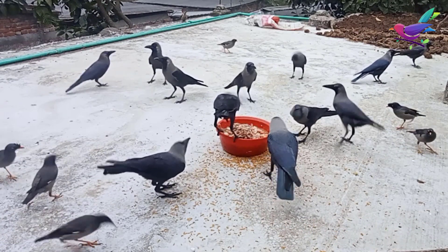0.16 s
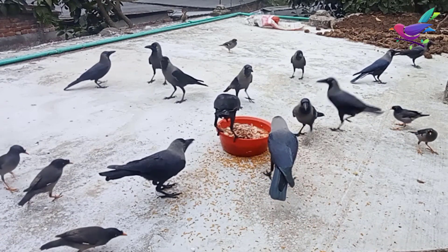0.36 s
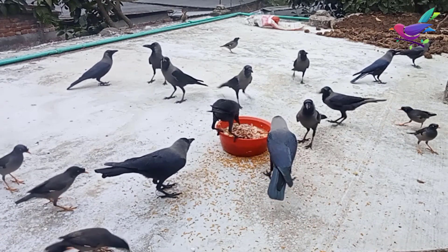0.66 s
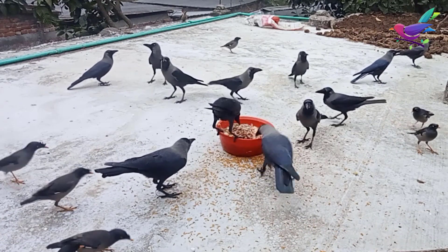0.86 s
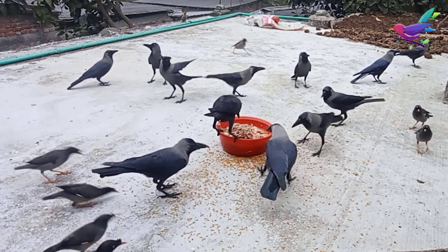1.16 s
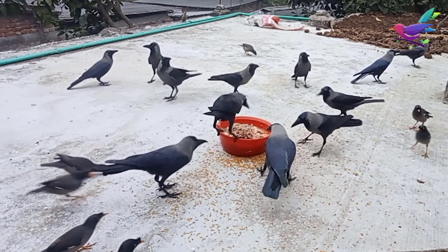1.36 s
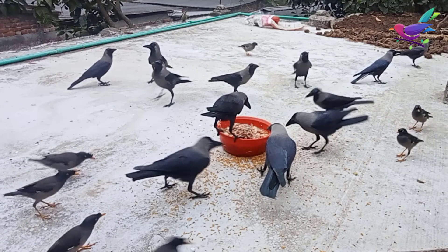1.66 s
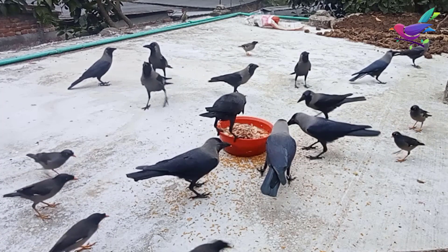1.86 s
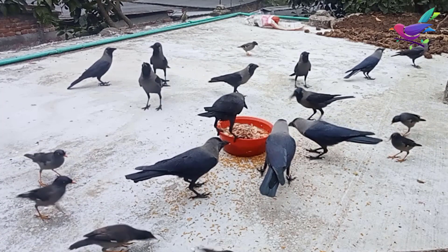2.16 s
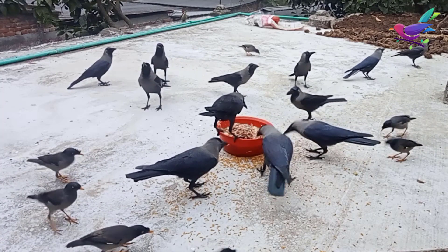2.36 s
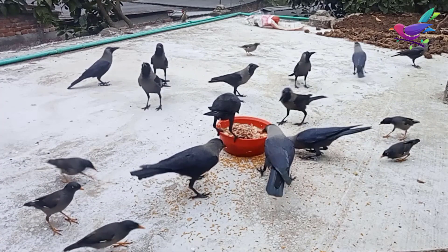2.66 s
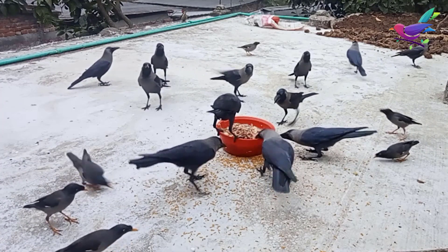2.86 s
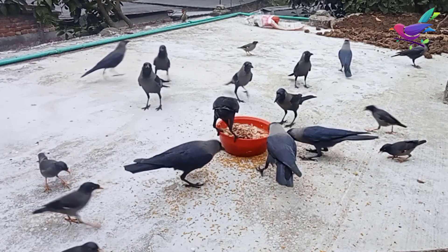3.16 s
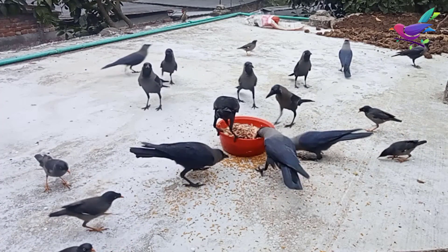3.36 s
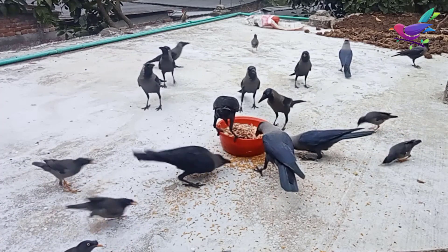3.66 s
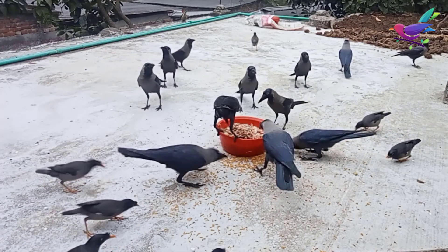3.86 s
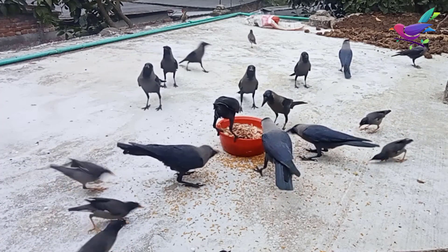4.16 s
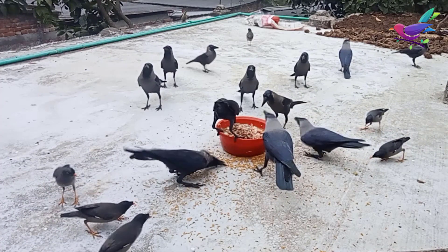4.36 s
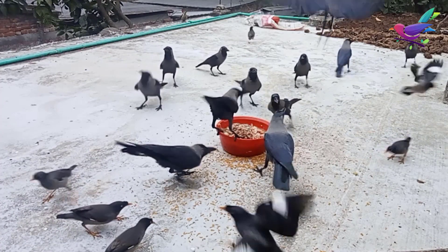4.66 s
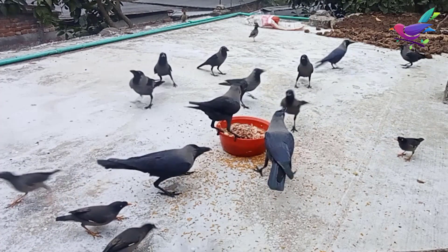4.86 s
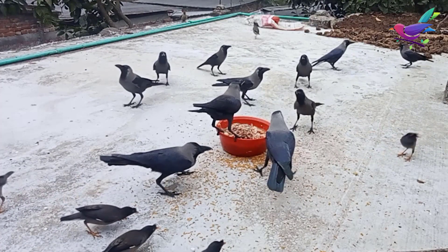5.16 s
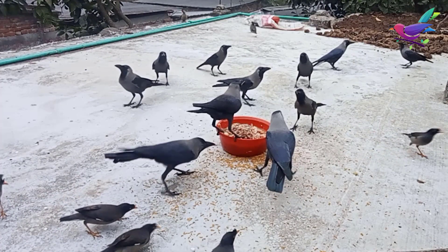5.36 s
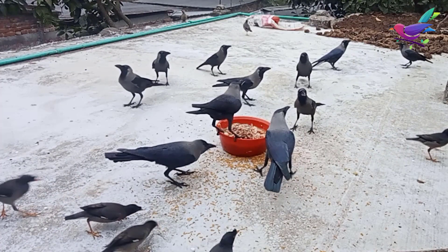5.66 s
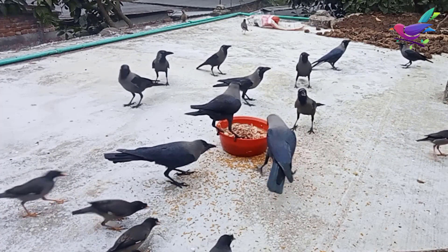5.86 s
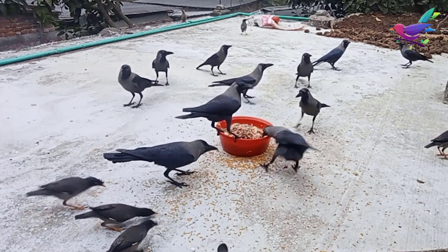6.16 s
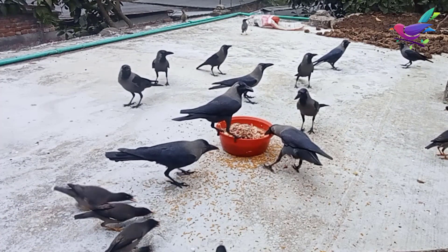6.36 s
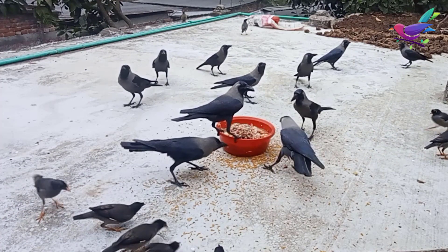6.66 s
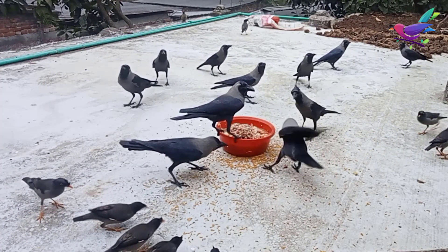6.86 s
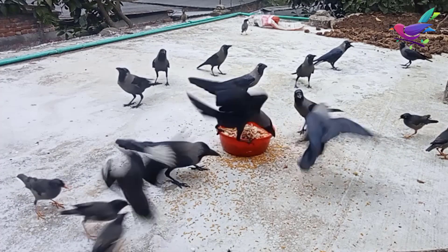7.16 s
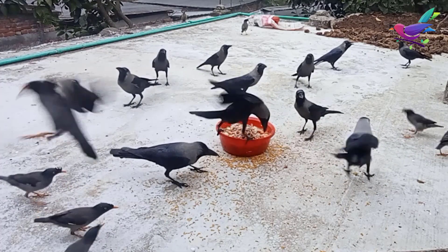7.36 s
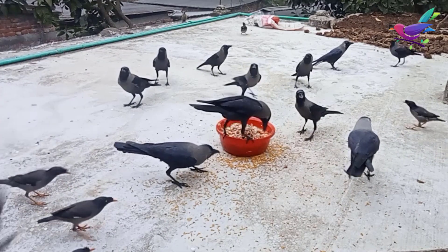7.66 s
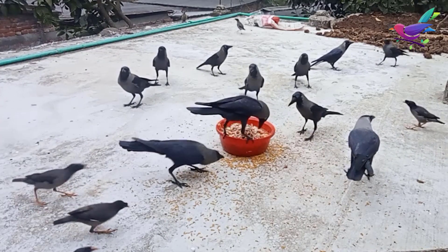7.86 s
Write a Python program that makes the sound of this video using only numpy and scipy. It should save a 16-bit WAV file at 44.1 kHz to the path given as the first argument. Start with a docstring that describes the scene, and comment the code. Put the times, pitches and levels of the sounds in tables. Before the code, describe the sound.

Beaks tick on concrete amid distant cawing, faint chirps and low traffic, ending with two loud caws from squabbling crows.

```python
"""A concrete rooftop over the low rumble of a town: crows and mynas feed from a plastic bowl.
Beaks tick and scrape, claws scatter grain, mynas chirp, crows caw from the trees, wings flap past.
Near the end two crows squabble close by: two loud, harsh caws, one running into the other.
Each call is a pulsing membrane, shaken into a rasp by a slower one. Pecks are impulses with a rattle;
wingbeats are swish, air puff and hum. Walls and trees echo; the microphone colours the treble."""
import sys
import numpy as np
from scipy import signal
from scipy.io import wavfile
from scipy.ndimage import map_coordinates

SR = 44100
rng = np.random.default_rng(int(sys.argv[2]) if len(sys.argv) > 2 else 0)


def to_wav(s):
    """Save 16-bit WAV."""
    ch = np.atleast_2d(s).T  # columns
    pcm = np.round(np.clip(ch, -1, 1) * 32767)  # PCM
    wavfile.write(sys.argv[1], SR, pcm.astype(np.int16))


N = 352800
TIME = np.arange(N) / SR

# traffic wash with the microphone's treble colour: (frequency [Hz], gain [dB])
WASH_COLOUR = [(15, -43), (25, -52), (91, -1.5), (193, 0.5), (523, -12.5), (684, -13), (1200, -17.5),
               (1900, -17), (2230, -22), (3260, -24), (3720, -24.5), (5010, -46.5), (6920, -34),
               (10600, -45), (15500, -37)]
# deepest part of the traffic: (frequency [Hz], gain [dB])
RUMBLE_SPECTRUM = [(20, -25), (40, -22), (65, -4), (100, -3.5), (160, -13.5), (400, -41.5)]
# swells of rumble and hollow drone: (centre [s], half length [s], level [dB])
RUMBLE_SWELLS = [(2.0, .42, -57), (5.0, 0.4, -50), (7.0, 0.45, -58)]
DRONE_SWELLS = [(2.35, 0.33, -56.5), (5.2, 0.44, -48.5), (6.5, 0.57, -54.5)]
# myna calls: (time [s], length [s], start pitch [Hz], end pitch [Hz], level [dB], roughness [0-1],
# throat resonance [Hz])
MYNA_CHIRPS = [(0.066, 0.075, 1680, 1926, -56.5, 0.5, 3180), (0.768, 0.05, 1440, 1210, -54, 0, 2700),
               (0.837, 0.053, 1216, 1510, -56, 0, 2680), (0.854, 0.0537, 1686, 1470, -42, 0.08, 1580),
               (0.874, 0.06, 1579, 1394, -42, 0.02, 2870), (2.769, 0.11, 1158, 1380, -47, 0, 2620),
               (2.873, 0.059, 1576, 1586, -49.5, 0.1, 2620), (2.905, 0.053, 1536, 1380, -42, 0.05, 3020),
               (2.97, 0.068, 1690, 1610, -52, 0.9, 3400), (4.241, 0.056, 1290, 1470, -58.5, 0.2, 2700)]
# tone colour of the myna chirps, microphone colour included: (frequency [Hz], gain [dB])
CHIRP_COLOUR = [(900, 3), (1250, -6), (1600, -4.5), (2400, -0.5), (3000, -3.5), (3700, -8), (4500, -23),
                (5400, -32), (7300, -24), (12000, -33)]
# feet and feathers in the grain: (centre [s], half length [s], level [dB])
SCUFFLE_BOUTS = [(.6, 0.34, -63), (1.9, 0.23, -62), (2.5, 0.16, -64), (3.0, 0.088, -52.5), (3.75, .14, -64),
                 (4.75, 0.45, -59), (5.36, 0.29, -61.5), (6.08, 0.22, -57), (6.65, 0.24, -58)]
# clear pecks on concrete, grain and bowl: (time [s], beak clack [dB], grain tick [dB])
PECKS = [(.3705, -62, -50), (.4609, -73, -44), (.5572, -65, -43.5), (1.1513, -45, -43), (1.1738, -49, -52),
         (1.5174, -54, -49), (1.5938, -69, -46.5), (1.8863, -24.5, -37), (1.995, -51, -51),
         (2.7820, -53, -43.5), (3.033, -35.5, -43), (3.3363, -53, -49), (3.467, -70, -48.5),
         (3.6568, -51.5, -55), (3.9606, -53, -47.5), (4.373, -46, -43), (4.5355, -50, -41.5),
         (4.9672, -50, -39), (5.2825, -31.5, -45), (5.3307, -46, -47), (6.215, -53.5, -43.5),
         (6.273, -57, -47), (6.4836, -45.5, -47.5), (6.788, -53, -56), (6.8933, -57, -44.5),
         (7.9194, -65, -57)]
# thuds of heavy blows: (time [s], level [dB])
KNOCKS = [(1.886, -28.5), (5.283, -33), (6.352, -45)]
# thud and beak clack: (frequency [Hz], gain [dB])
KNOCK_SPECTRUM = [(200, -13), (500, -10.5), (1100, -4), (1600, -1), (2100, -7), (3000, -37)]
CLACK_SPECTRUM = [(800, -46), (2300, -10.5), (3250, 7.5), (3900, -3), (4600, -7), (5400, -22.5),
                  (9000, -30)]
# grain tick with the microphone's treble colour: (frequency [Hz], gain [dB])
TICK_COLOUR = [(3000, -6), (5200, -9.5), (6300, -1.5), (7300, 3.5), (9000, -8), (12000, -11), (15000, -4.5)]
# drags over the floor: (centre [s], half length [s], clack [dB], tick [dB])
SCRAPES = [(0.394, 0.03, -59, -59), (0.581, .015, -57.5, -59), (2.47, 0.03, -63, -54.5),
           (2.988, 0.023, -41.5, -46), (5.998, 0.013, -42, -41), (6.522, 0.01, -57, -53),
           (6.875, 0.05, -55, -67)]
# caws from the trees: (time [s], length [s], pitch [Hz], level before the mix [dB],
# beak resonance [Hz], its width [Hz], roughness [0-1], final pitch drop [0-1])
FAR_CAWS = [(0.5, 0.47, 451, -59, 1460, 1200, 0.7, 0.2),
            (1.385, 0.38, 540.2, -46.5, 1570, 1090, 0.35, 0.24),
            (1.968, 0.13, 467, -50.5, 1360, 690, 0.54, 0.26),
            (2.113, .37, 536.3, -41.5, 1600, 740, 0.5, 0.22),
            (2.318, 0.49, 529, -44.5, 2060, 750, 0.57, 0.25),
            (3.356, .53, 498.7, -47.5, 1900, 750, 0.71, 0.17),
            (3.919, 0.34, 498, -54, 1930, 395, 0.7, 0.28), (4.25, 0.43, 485.6, -53, 1480, 900, 0.6, .22),
            (5.002, 0.37, 560.7, -43.5, 1595, 230, 0.6, 0.14),
            (5.256, 0.3, 522, -40.5, 1710, 770, 0.37, 0.22), (5.838, .355, 544.7, -43, 1270, 910, 0.4, .27)]
# tone colour of the far caws, microphone colour included: (frequency [Hz], gain [dB])
FAR_CAW_COLOUR = [(300, -32), (600, -8), (1050, 1.5), (1350, 2.5), (2100, 3), (2900, -11.5), (4100, -9),
                  (5200, -21), (7200, -4), (9000, -28), (15000, -31)]
# passing birds: (first downstroke [s], beats [count], nearest [s], swish [dB], thump [dB], hum [dB])
FLIGHTS = [(4.649, 4, 4.76, -39, -34, -44.5), (7.036, 2, 7.1, -44.5, -40.5, -47.5),
           (7.99, 1, 7.99, -50.5, -40.5, -62)]
# wing swish with the microphone's treble colour: (frequency [Hz], gain [dB])
SWISH_COLOUR = [(150, -11), (500, 3.5), (900, -1), (1600, 0), (2500, -2), (3700, -4.5), (5100, -27),
                (7200, -9.5), (10000, -22.5), (15000, -14)]
# air puff: (frequency [Hz], gain [dB])
THUMP_SPECTRUM = [(25, -32), (60, -9), (120, 6), (220, -2.5), (450, -7), (900, -8), (3000, -80)]
# squabble: (time [s], length [s], pitch [Hz], level [dB], fade [dB], fall as the beak shuts [dB],
# final clearing of the rasp [s], flutter [Hz], pitch swing [0-1], throb [0-1], roughness [0-1])
CLOSE_CAWS = [(7.05, .325, 579.5, -13, 11.5, 13.5, 0.088, 75.7, 0.06, 0.3, 0.01),
              (7.315, 0.35, 593.8, -18, 4.5, 22, 0.072, 81.2, 0.08, 0.32, 0.01)]
# tone colour of each close caw, microphone colour included: (frequency [Hz], gain [dB])
FIRST_COLOUR = [(300, -35.5), (600, -33), (850, -9), (1050, -8.5), (1300, -12.5), (1700, -19), (2100, -1),
                (2650, -2.5), (3050, -15), (3400, -13.5), (3950, -28.5), (4550, -21.5), (5250, -41),
                (6300, -21), (7400, -18.5), (8500, -33.5), (15000, -44.5)]
SECOND_COLOUR = [(300, -29), (600, -33.5), (1000, -6.5), (1500, -8), (2100, 6.5), (2500, -6.5), (3100, -28),
                 (3700, -29.5), (4100, -23.5), (4500, -33), (5100, -38), (6300, -30), (7200, -22),
                 (8600, -40), (15000, -55)]
# floor and parapet reflections: (delay [s], gain [dB])
BOUNCES = [(.0037, -30), (.0094, -22), (0.0181, -11), (.026, -23)]
# echo of walls and trees: (frequency [Hz], 60 dB decay time [s])
ECHO_T60 = [(200, 0.36), (1000, 0.41), (2200, 0.5), (5000, 0.82), (12000, 0.17)]

BAND_LIMIT_HZ = 15750


def gain_of(db):
    """Decibels to amplitude."""
    return 10 ** (np.asarray(db) / 20)


def unit_rms(x):
    """Scale to rms 1."""
    return x / np.sqrt(np.mean(x ** 2) + 1e-20)


def curve_at(points, hz):
    """Interpolate over log frequency."""
    points_hz, values = np.transpose(points)
    return np.interp(np.log(hz + 1), np.log(points_hz + 1), values)


def add(mix, start_s, sound):
    """Mix in place from start_s."""
    part = mix[max(round(start_s * SR), 0):][:len(sound)]
    part += sound[:len(part)]


def colour(x, spectrum, size=4096):
    """Minimum-phase filter with the given spectrum."""
    log_gain = np.log(gain_of(curve_at(spectrum, abs(np.fft.fftfreq(size, 1 / SR)))))
    taps = np.fft.ifft(np.exp(np.conj(signal.hilbert(log_gain)))).real[:size // 2]
    return signal.oaconvolve(x, taps)[:len(x)]


def resonate(x, hz, width_hz):
    """One resonance."""
    return signal.lfilter(*signal.iirpeak(hz, hz / width_hz, SR), x)


def wander(t, rate_hz):
    """Smooth random curve, rms about 1."""
    return map_coordinates(rng.standard_normal(4096), [(t - t[0]) * rate_hz], order=3, mode="wrap")


def swells(rows, rest_db):
    """Envelope: bell-shaped swells over a resting level."""
    power = sum((gain_of(db) * np.exp(-((TIME - at_s) / half_s) ** 2)) ** 2 for at_s, half_s, db in rows)
    return np.sqrt(power + gain_of(rest_db) ** 2)


def stroke(centre_s, half_s, shape=1.3):
    """Envelope: pointed rise and fall."""
    return np.exp(-abs((TIME - centre_s) / half_s) ** shape)


def town():
    """Traffic: heaving wash and deep rumble, with a hollow drone above."""
    wash = unit_rms(colour(rng.standard_normal(N), WASH_COLOUR))
    wash *= gain_of(-51.5 + 1.3 * wander(TIME, 5.19))
    wash = signal.lfilter(*signal.butter(2, 95, "high", fs=SR), wash)
    rumble = unit_rms(colour(rng.standard_normal(N), RUMBLE_SPECTRUM))
    rumble *= swells(RUMBLE_SWELLS, rest_db=-64.5)
    drone = resonate(rng.standard_normal(N), hz=603, width_hz=310)
    drone = unit_rms(resonate(drone, hz=304, width_hz=390))
    return wash + rumble + drone * swells(DRONE_SWELLS, rest_db=-76.5) * gain_of(wander(TIME, 14))


def syrinx(t, hz, rough, flutter_hz, swing, throb, jitter, breathy_hz=5000, sag=0, lead_rad=1.45, snap=1):
    """One membrane sets the pitch; a slower one shakes pitch (swing) and level (throb) into a rasp."""
    flutter = 2 * np.pi * np.cumsum(flutter_hz * (1 + 0.036 * wander(t, 48))) / SR
    shake = np.sin(flutter) + snap * np.sin(2 * flutter)  # quick one way, slow back
    phase = 2 * np.pi * np.cumsum(hz * (1 + swing * shake + jitter * wander(t, 400))) / SR
    # high overtones give way to air-jet hiss
    harmonics = range(1, int(BAND_LIMIT_HZ / hz.max()))
    pulses = sum(np.cos(k * phase) / np.sqrt(1 + (k * hz / breathy_hz) ** 6) for k in harmonics)
    pulses += sag * np.cos(2 * phase)  # a slack membrane favours harmonic 2
    breath = rng.standard_normal(SR)[:len(t)] * np.sqrt(SR / (4 * hz)) * (1 + 0.5 * np.cos(phase))
    jet = signal.lfilter(*signal.butter(3, breathy_hz, "high", fs=SR), breath)
    voice = np.sqrt(1 - rough) * (pulses + jet) + np.sqrt(rough) * breath
    return voice * (1 + throb * np.sin(flutter + lead_rad)) * gain_of(0.2 * wander(t, 112))


def mynas():
    """Short, hoarse syrinx glides through one resonance."""
    out = np.zeros(N)
    for start_s, length_s, start_hz, end_hz, db, rough, throat_hz in MYNA_CHIRPS:
        t = np.arange(0, length_s, 1 / SR)
        hz = np.linspace(start_hz, end_hz, len(t))
        voice = syrinx(t, hz, 0.5 * rough, flutter_hz=152, swing=0.011, throb=0.33, jitter=0.028)
        voice = resonate(colour(voice, CHIRP_COLOUR), throat_hz, width_hz=1300)
        add(out, start_s, gain_of(db) * unit_rms(voice) * signal.windows.tukey(len(t), 0.7))
    return out


def scuffle(grains_per_s=55, decay_s=0.005):
    """Claws and scattered grain: many tiny ticks."""
    sizes = gain_of(5 * np.minimum(rng.exponential(1, N), 3))
    hits = sizes * (rng.random(N) < grains_per_s / SR)
    scratch = signal.lfilter([1], [1, -np.exp(-1 / (decay_s * SR))], hits) * rng.standard_normal(N)
    return unit_rms(colour(scratch, TICK_COLOUR)) * swells(SCUFFLE_BOUTS, rest_db=-72.5)


def blow(spectrum, ring_s, scatter):
    """Sharp contact, brief rattle; total energy equals 4 ms at rms 1."""
    t = np.arange(3000) / SR
    force = scatter * rng.standard_normal(len(t)) * (np.exp(-t / ring_s) + 0.08 * np.exp(-t / 0.017))
    force[0] += 1
    detune = rng.uniform(0.96, 1.03)
    sound = colour(force, np.multiply(spectrum, [detune, 1]))
    return sound / np.sqrt(np.sum(sound ** 2) / (0.004 * SR))


def pecks(faint_per_s=2.5):
    """Beak clack plus grain tick; heavy blows thud. The rest of the flock pecks faintly at random."""
    out = np.zeros(N)
    faint_s = TIME[rng.random(N) < faint_per_s / SR]
    force_db = 1.5 * rng.standard_normal(len(faint_s))
    faint = list(zip(faint_s, force_db - 65, force_db - 58.5))
    for at_s, db in KNOCKS:
        add(out, at_s, gain_of(db) * blow(KNOCK_SPECTRUM, ring_s=0.0074, scatter=0.076))
    for at_s, clack_db, tick_db in list(PECKS) + faint:
        add(out, at_s, gain_of(clack_db) * blow(CLACK_SPECTRUM, ring_s=0.0015, scatter=0.21))
        add(out, at_s, gain_of(tick_db) * blow(TICK_COLOUR, ring_s=0.0064, scatter=0.13))
    return out


def scrapes():
    """Beaks and claws drag over the floor: gritty noise with the spectra of a peck."""
    clack, tick = np.zeros((2, N))
    for centre_s, half_s, clack_db, tick_db in SCRAPES:
        drag = stroke(centre_s, half_s, shape=1)
        clack += gain_of(clack_db) * drag
        tick += gain_of(tick_db) * drag
    grit = rng.standard_normal(N) * gain_of(4.6 * wander(TIME, 500))
    return clack * unit_rms(colour(grit, CLACK_SPECTRUM)) + tick * unit_rms(colour(grit, TICK_COLOUR))


def far_caws(leap=0.11, rise_s=0.03016, attack_db=13, fade_db=10.5):
    """Crows in the trees: pitch rises, holds, then drops; the rasp eases as the caw fades."""
    out = np.zeros(N)
    for start_s, length_s, top_hz, db, beak_hz, width_hz, rough, drop in FAR_CAWS:
        t = np.arange(0, length_s, 1 / SR)
        onset, progress = np.exp(-t / rise_s), t / length_s
        hz = top_hz * (1 - leap * onset) * (1 - drop * progress ** 4)
        rasp = rough * (1 - 0.5 * progress ** 3)
        voice = syrinx(t, hz, 0.8 * rasp ** 2, flutter_hz=66, swing=0.085 * rasp, throb=0.45,
                       jitter=0.007, breathy_hz=3570)
        voice = unit_rms(resonate(colour(voice, FAR_CAW_COLOUR), beak_hz, width_hz))
        level_db = db - attack_db * onset - fade_db * progress ** 3
        add(out, start_s, voice * signal.windows.tukey(len(t), 0.1) * gain_of(level_db))
    return out


def wings(beat_s=0.1392, slowing_s=0.0082, pass_s=0.19, hum_hz=490):
    """Each beat: soft lift, sharp downstroke with a puff of air, then stiff feathers hum."""
    swish, thump, hum = np.zeros((3, N))
    for down_s, beats, nearest_s, swish_db, thump_db, hum_db in FLIGHTS:
        for beat in range(round(beats)):
            period_s = beat_s + beat * slowing_s
            nearness = 1 / np.hypot(1, (down_s - nearest_s) / pass_s)
            down = stroke(down_s, half_s=0.012)
            lift = gain_of(-5) * stroke(down_s - period_s / 2, half_s=0.045)
            swish += gain_of(swish_db) * nearness * (down + lift)
            thump += gain_of(thump_db) * nearness ** 2 * down  # dies faster with distance
            hum += gain_of(hum_db) * stroke(down_s + period_s / 2, half_s=0.027)
            down_s += period_s
    rustle = unit_rms(colour(rng.standard_normal(N), SWISH_COLOUR))
    rustle *= gain_of(1.6 * wander(TIME, 250))
    tone_hz = hum_hz * (1 + 0.097 * wander(TIME, 130.5))
    tone = unit_rms(np.sin(2 * np.pi * np.cumsum(tone_hz) / SR))
    air = unit_rms(colour(rng.standard_normal(N), THUMP_SPECTRUM))
    return swish * rustle + thump * air + hum * tone


def close_caw(row, spectrum, jitter, slack, lead_rad, snap):
    """Pitch leaps up, sinks as air runs out, and collapses in a clean glide as the beak shuts."""
    start_s, length_s, top_hz, db, fade_db, shut_db, clear_s, flutter_hz, swing, throb, rough = row
    leap, leap_s, attack_db, attack_s = 0.42, 0.029, 21, 0.021
    sink_hz_per_s, collapse, shut_s = 500, 0.53, 0.07
    t, out = np.arange(0, length_s, 1 / SR), np.zeros(N)
    onset = np.exp(-(t / leap_s) ** 1.5)
    shut = np.clip(1 - (length_s - t) / shut_s, 0, 1)
    hz = (top_hz - sink_hz_per_s * t) * (1 - leap * onset) * (1 - collapse * shut ** 1.5)
    level_db = db - attack_db * np.exp(-(t / attack_s) ** 1.9)
    level_db -= fade_db * (t / length_s) ** 3 + shut_db * shut ** 1.47
    rasp = (1 - 0.62 * onset) * np.clip(((length_s - t) / clear_s) ** 2, 0.1, 1)
    sag = slack * np.clip((450 - hz) / 130, 0, 1.9) ** 2
    voice = syrinx(t, hz, rough, flutter_hz, swing * rasp, throb * rasp, jitter,
                   breathy_hz=6600, sag=sag, lead_rad=lead_rad, snap=snap)
    add(out, start_s, unit_rms(colour(voice, spectrum)) * gain_of(level_db))
    return out


def bounced(x):
    """Direct sound plus floor and parapet reflections."""
    out = x.copy()
    for delay_s, db in BOUNCES:
        add(out, delay_s, gain_of(db) * x)
    return out


def echoes(x, count=2000):
    """Sparse reflections from walls and trees; each band has its own decay."""
    taps = np.zeros(SR)
    taps[rng.integers(SR // 200, SR, count)] = rng.choice([-1., 1.], count)
    hz, t, bands = signal.stft(taps, SR, nperseg=256)
    decay = gain_of(-60 * t / curve_at(ECHO_T60, hz)[:, None])
    tail = signal.istft(bands * decay, SR, nperseg=256)[1]
    return signal.fftconvolve(x, tail / np.linalg.norm(tail))[:N]


def scene():
    """Mono mix: near birds almost dry, far crows with strong echoes."""
    close = close_caw(CLOSE_CAWS[0], FIRST_COLOUR, jitter=0.0046, slack=7.8, lead_rad=0.26, snap=0.098)
    close += close_caw(CLOSE_CAWS[1], SECOND_COLOUR, jitter=0.0043, slack=8.9, lead_rad=0.59, snap=0.29)
    close = bounced(close)
    flock = pecks() + scrapes() + scuffle() + wings()
    far, chirps = far_caws(), mynas()
    echo_send = gain_of(-18) * close + gain_of(-23.5) * flock + gain_of(-4) * far + gain_of(-20) * chirps
    return (close + flock + chirps + gain_of(-2.5) * far + echoes(echo_send) + town())[None]


def record(dry):
    """Low-pass at the band limit."""
    taps = signal.firwin(401, BAND_LIMIT_HZ, window=("kaiser", 9), fs=SR)
    return signal.oaconvolve(dry, taps[None], "same", axes=1)


dry = scene()
out = record(dry)
to_wav(out)
```